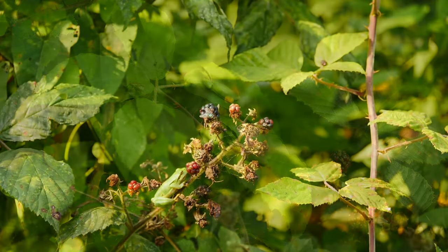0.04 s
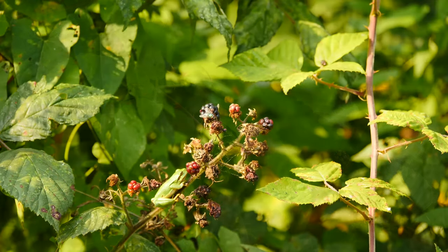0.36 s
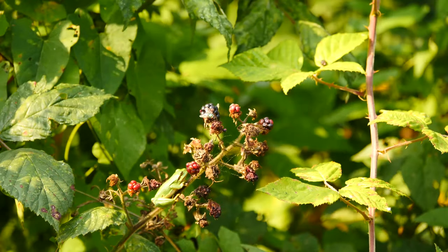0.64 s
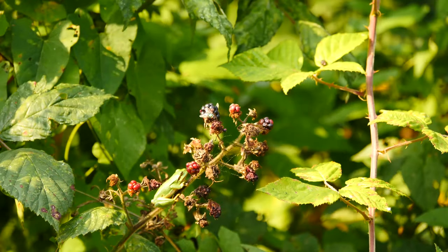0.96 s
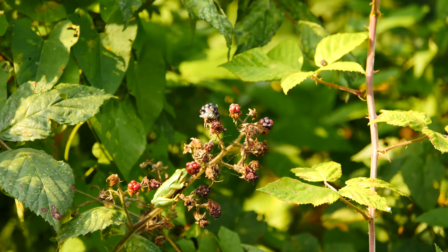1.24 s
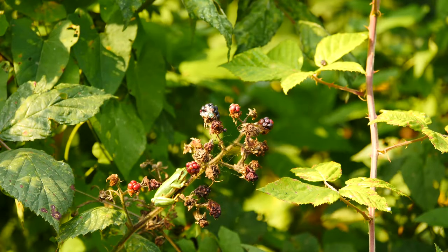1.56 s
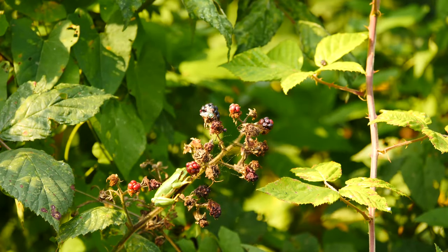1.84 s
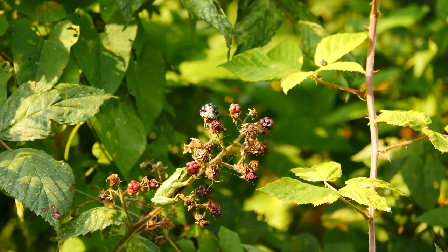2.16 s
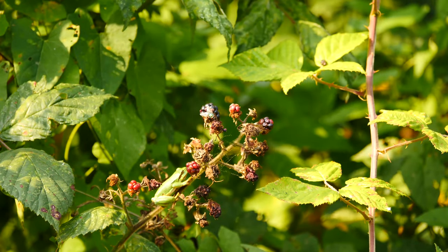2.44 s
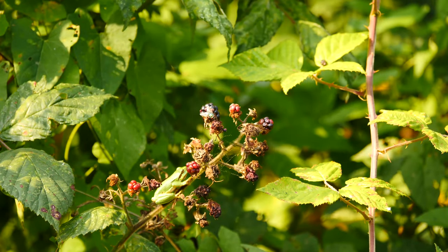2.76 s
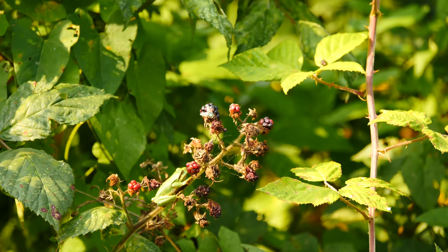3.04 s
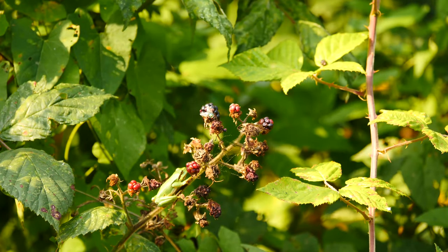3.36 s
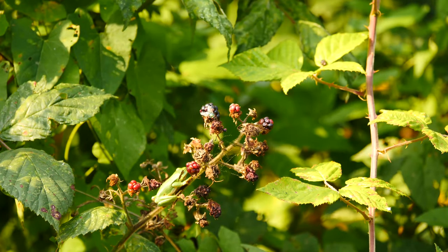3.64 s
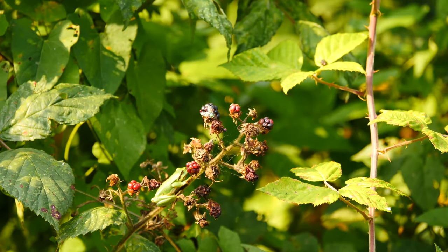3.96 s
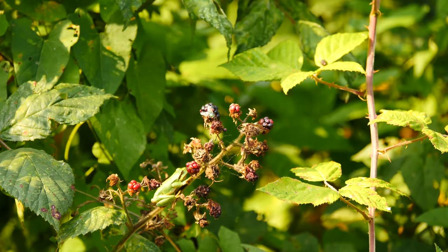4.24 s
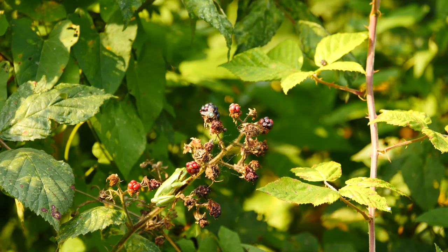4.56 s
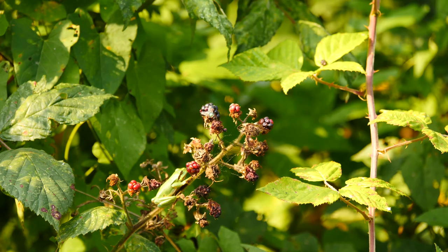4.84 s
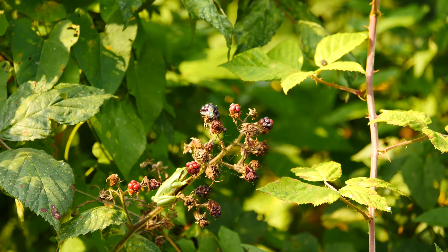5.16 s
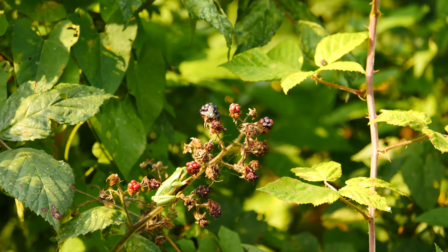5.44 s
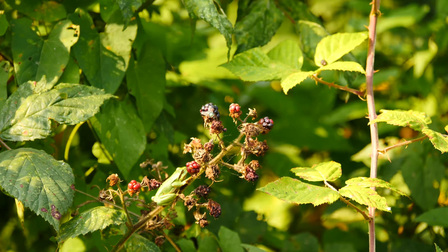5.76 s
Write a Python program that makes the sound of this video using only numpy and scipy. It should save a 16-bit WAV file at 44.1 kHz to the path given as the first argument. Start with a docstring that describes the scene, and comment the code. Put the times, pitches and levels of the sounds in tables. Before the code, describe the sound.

Several tree frogs croak in quick, overlapping rattles while a bush cricket trills close by, high and dry, over faint outdoor rumble.

```python
"""A bush cricket trills close by, high and dry, at a near-steady tempo with one short rest:
on each opening and closing stroke a scraper slips over a toothed file and rings the wing.
Several tree frogs croak in turn, each croak a quick rattle of pulses ringing in throat and vocal sac.
Behind them lie the thin hiss of far insects and a faint outdoor rumble."""
import sys
import numpy as np
from scipy import signal
from scipy.fft import rfft, irfft
from scipy.io import wavfile
from scipy.ndimage import uniform_filter1d, minimum_filter1d

SR = 44100
rng = np.random.default_rng(int(sys.argv[2]) if len(sys.argv) > 2 else 0)


def waveform_to_disk(signal):
    """Save audio, clipped to [-1, 1], as 16-bit WAV at the path in sys.argv[1]."""
    frames = np.transpose(np.atleast_2d(signal))
    scaled = np.clip(frames, -1, 1) * 32767
    samples = np.round(scaled).astype(np.int16)
    wavfile.write(sys.argv[1], SR, samples)


N = 255339


def gain_of(db):
    """Decibels to gain."""
    return 10 ** (np.asarray(db) / 20)


def unit_rms(x):
    """Normalises to rms 1."""
    return x / np.sqrt(np.mean(x ** 2) + 1e-20)


def curve_at(curve, hz):
    """Reads a curve on a log-frequency axis."""
    f, value = np.transpose(curve)
    return np.interp(np.log(hz + 1), np.log(f + 1), value)


def add(mix, start_s, sound):
    """Drops a sound into the mix, trimmed to fit."""
    at = round(start_s * SR)
    sound = sound[max(-at, 0):]
    part = mix[max(at, 0):][:len(sound)]
    part += sound[:len(part)]


def equalise(x, curve):
    """Applies an EQ curve."""
    return irfft(rfft(x) * gain_of(curve_at(curve, np.fft.rfftfreq(N, 1 / SR))), N)


def low_pass(x, hz):
    """Steep high cut."""
    return signal.fftconvolve(x, signal.firwin(511, hz, window=("kaiser", 9), fs=SR), "same")


def drift(rate_hz):
    """Random modulator of rms 1."""
    t = np.arange(N) / SR
    knots = np.arange(0, t[-1] + 1, 1 / rate_hz)
    return unit_rms(np.interp(t, knots, rng.standard_normal(4096)[:len(knots)]))


# tone of the rumble: (frequency [Hz], relative level [dB])
RUMBLE_EQ = [(20, 1), (60, -3.5), (130, 0), (300, -2), (700, -4), (1100, -1.5), (1700, -6), (2300, -1),
             (3200, -7.5), (3950, -9), (4250, -42), (6000, -62)]
# its stereo image: (frequency [Hz], left-right correlation [0-1])
RUMBLE_CORRELATION = [(25, 1), (70, 0.85), (160, 0.19), (400, 0.61), (800, 0.99), (1500, 1)]


def rumble(level_db=-49, waver_db=3.0):
    """A bed of low outdoor noise, widest in the upper bass."""
    mid, side = rng.standard_normal((2, N))
    correlation = np.clip(curve_at(RUMBLE_CORRELATION, np.fft.rfftfreq(N, 1 / SR)), -1, 1)
    mid = irfft(rfft(mid) * np.sqrt(1 + correlation), N)
    side = irfft(rfft(side) * np.sqrt(1 - correlation), N)
    bed = unit_rms(equalise(np.array([mid + side, mid - side]), RUMBLE_EQ))
    return gain_of(level_db + waver_db * drift(rate_hz=14)) * bed


# tone of the far insects: (frequency [Hz], relative level [dB])
INSECT_EQ = [(3000, -42), (5000, -33.5), (7000, -23), (8500, -7.5), (9600, 5.5), (10700, 0), (12000, -5),
             (14000, -16), (16000, -15)]


def far_insects(level_db=-36, waver_db=2.03, side_db=-14):
    """Many distant insects merge into a wavering hiss."""
    mid, side = (unit_rms(equalise(rng.standard_normal(N), INSECT_EQ)) for _ in range(2))
    hiss = mid + gain_of(side_db) * np.array([side, -side])
    return gain_of(level_db + waver_db * drift(rate_hz=39)) * hiss


def foliage(x, t60, predelay_s=0.0041):
    """Sparse reflections from leaves and ground, dying quickly."""
    t = np.arange(SR // 2) / SR
    taps = rng.standard_normal(len(t)) * (rng.random(len(t)) < .1)
    taps *= (t > predelay_s) * gain_of(-60 * t / t60)
    return signal.fftconvolve(x, taps / np.linalg.norm(taps))[:N]


# frog presets by name: (upper ring [Hz], lower ring [Hz], lower ring level [dB], pulse length [ms],
# crescendo [dB], slowing [share, negative speeds up], pitch climb over the croak [share])
FROG_VOICES = {"deep": (2210, 1062.5, -4.5, 5.5, 8, 0.21, 0.05),
               "high": (2606, 1264, -5.5, 3.5, 6.5, -0.16, 0.08),
               "middle": (2288.5, 1186, -7.5, 6, 4.5, -0.12, .03),
               "low": (2150, 1001.5, -12.5, 4.5, 5, 0.29, 0),
               "quick": (2325, 1115.5, -3.5, 4.5, 2, 0, 0.07),
               "sharp": (2290, 1065, -10.5, 4, 8, 0.14, .025), "far": (2654, 1244.5, 3.5, 4, 0.5, -0.03, 0)}


def croak(start_s, voice, count, rate_hz, db, droop=0.0366, scatter=0.01401, detune=0.00622,
          uneven_db=0.54, skew=0.23, lower_lag_s=0.00055, lower_stretch=1.15):
    """Pulses swell and lengthen; in each, two resonances sag in pitch as the pressure drops."""
    upper_hz, lower_hz, lower_db, length_ms, crescendo_db, slowing, climb = FROG_VOICES[voice]
    progress = np.linspace(0, 1, count)[:, None]
    chance = rng.standard_normal((12, 5))[:count, :, None]  # per pulse: level, two pitches, two phases
    tuning = 1 + detune * rng.standard_normal()
    pulse_s = (count - 1) / rate_hz * (progress + slowing * progress * (progress - 1))
    t = np.arange(-.012, pulse_s[-1, 0] + .02, 1 / SR) - pulse_s
    swell_db = crescendo_db * (count / 6.67) ** 1.7  # a longer croak starts more softly
    force = gain_of(db - swell_db * (progress / 0.69 - 1) ** 2 + uneven_db * chance[:, 0])
    half_s = length_ms / 1000 * (0.71 + 0.56 * progress) / 2

    def ring(hz, age, k):
        """One resonance, its attack quicker than its decay."""
        envelope = force * (1 + (age / (1 + skew * np.tanh(age))) ** 2 / 3) ** -3
        pitch = hz * (tuning + climb * (progress - .7) + scatter * chance[:, k] - droop * np.tanh(age))
        cycles = np.cumsum(pitch, 1) / SR + chance[:, k + 2]
        return envelope * np.sin(2 * np.pi * cycles), envelope

    upper, envelope = ring(upper_hz, t / half_s, 1)
    lower, _ = ring(lower_hz, (t - lower_lag_s) / (half_s * lower_stretch), 2)
    rattle = (upper + gain_of(lower_db) * lower).sum(0)
    return start_s + t[0, 0], rattle, envelope.sum(0)


def distant_croaks(level_db=-44, spread_db=2, calls=34):
    """Faint frogs further back call at random and fill the pauses."""
    mix = np.zeros(N)
    for k, (when, who, loud) in enumerate(rng.random((calls, 3))):
        voice = list(FROG_VOICES)[int(who * len(FROG_VOICES))]
        db = level_db + spread_db * (2 * loud - 1)
        start_s, rattle, _ = croak((k + when) / calls * N / SR, voice, count=7, rate_hz=92, db=db)
        add(mix, start_s, rattle)
    return mix


# cue list, one croak a row: (time [s], voice, pulses [count], pulse rate [Hz], relative level [dB])
CROAK_CUES = [(-.029, "high", 5, 78, -21), (-.015, "quick", 6, 115, -24), (.036, "low", 6, 122, -27),
              (.135, "far", 6, 81, -32.5), (.188, "low", 7, 106, -26), (.276, "high", 7, 92, -19.5),
              (.359, "low", 5, 99, -27), (.406, "deep", 6, 72.6, -20.5), (0.42, "quick", 7, 103, -29),
              (.473, "far", 5, 87, -35.5), (.498, "low", 7, 106, -29), (.585, "high", 6, 89, -20.5),
              (.618, "quick", 6, 118, -27.5), (.638, "low", 9, 115, -29), (.722, "deep", 4, 63, -21.5),
              (.772, "quick", 8, 98, -28), (0.79, "low", 7, 101, -27.5), (.884, "quick", 7, 110, -29.5),
              (.905, "high", 5, 88, -21), (.958, "deep", 7, 71.5, -22), (.974, "low", 7, 91, -31.5),
              (1.031, "quick", 5, 105, -28), (1.067, "middle", 7, 94, -24.5), (1.141, "low", 9, 100, -24),
              (1.214, "deep", 6, 72.4, -21), (1.217, "high", 5, 95, -20), (1.238, "quick", 5, 92, -40),
              (1.297, "low", 5, 99, -28), (1.343, "far", 6, 82, -33.5), (1.405, "low", 4, 97, -42),
              (1.453, "low", 7, 97, -26), (1.492, "deep", 4, 71, -21), (1.5, "high", 6, 80, -23.5),
              (1.511, "quick", 5, 84, -32), (1.612, "middle", 7, 72, -28), (1.712, "deep", 5, 73, -23.5),
              (1.738, "sharp", 5, 104, -29), (1.76, "high", 9, 85, -23), (1.864, "quick", 5, 94, -33),
              (1.908, "deep", 9, 72.6, -21.5), (1.961, "far", 7, 65, -37), (1.996, "quick", 7, 122, -29),
              (2.115, "high", 7, 89, -20.5), (2.182, "deep", 7, 78.5, -21.5), (2.208, "quick", 10, 97, -40),
              (2.216, "middle", 7, 82, -26), (2.277, "sharp", 10, 110, -25), (2.295, "far", 6, 76, -32),
              (2.34, "far", 5, 115, -37), (2.442, "high", 6, 94, -20.5), (2.452, "deep", 6, 72, -22),
              (2.575, "quick", 9, 104, -27.5), (2.633, "far", 6, 82, -35), (2.664, "deep", 7, 68, -21.5),
              (2.774, "sharp", 6, 110, -23), (2.776, "high", 6, 77, -22), (2.829, "quick", 7, 106, -28.5),
              (2.901, "deep", 9, 78.5, -22.5), (2.945, "sharp", 5, 120, -25.5),
              (2.955, "middle", 5, 68.6, -25), (3.073, "high", 8, 96, -24), (3.083, "quick", 8, 92, -28),
              (3.197, "deep", 7, 80, -23.5), (3.221, "middle", 8, 88, -25), (3.263, "quick", 8, 112, -28),
              (3.324, "quick", 8, 95, -29.5), (3.381, "high", 6, 83.6, -21.5),
              (3.429, "sharp", 7, 114, -24.5), (3.491, "far", 6, 93, -34), (3.508, "deep", 6, 67, -19.5),
              (3.54, "middle", 6, 60, -28), (3.594, "quick", 7, 124, -26.5), (3.674, "high", 9, 91, -21.5),
              (3.743, "sharp", 9, 104, -22), (3.795, "quick", 6, 90, -30.5), (3.833, "deep", 6, 69, -20),
              (3.888, "middle", 9, 83, -26.5), (3.931, "sharp", 5, 110, -26), (4.02, "far", 6, 103, -34.5),
              (4.046, "quick", 8, 114, -26.5), (4.112, "deep", 6, 69.5, -20), (4.17, "sharp", 6, 105, -23),
              (4.215, "middle", 6, 81, -26), (4.24, "high", 7, 84, -31.5), (4.243, "quick", 9, 98, -26.5),
              (4.322, "low", 6, 89, -27), (4.35, "sharp", 7, 100, -23.5), (4.4, "deep", 5, 69, -19),
              (4.483, "quick", 9, 105, -24), (4.507, "high", 6, 70, -26), (4.571, "sharp", 8, 113, -24.5),
              (4.636, "deep", 8, 82, -20), (4.711, "low", 5, 88, -26.5), (4.766, "middle", 8, 83, -28),
              (4.77, "far", 6, 84, -34), (4.85, "quick", 7, 94, -27), (4.855, "far", 5, 85, -34.5),
              (4.895, "deep", 6, 72.6, -21), (4.912, "sharp", 7, 107, -28.5), (4.978, "far", 6, 93, -35),
              (5.043, "deep", 8, 74, -23.5), (5.061, "far", 7, 75, -36), (5.16, "far", 9, 89, -33.5),
              (5.176, "low", 5, 109, -28.5), (5.216, "quick", 9, 107, -30), (5.326, "low", 6, 94, -28.5),
              (5.394, "middle", 6, 81, -25.5), (5.405, "quick", 8, 119, -28), (5.413, "far", 6, 81, -32.5),
              (5.486, "low", 6, 91, -29), (5.596, "quick", 8, 140, -29.5), (5.6, "far", 6, 84, -34),
              (5.655, "low", 4, 95, -24), (5.679, "middle", 9, 97, -24.5)]


def frogs(gain_db=2.5, rasp_db=-13, echo_db=-16, cutoff_hz=4080):
    """The chorus: ringing pulses, their rasp of air, and a short echo from the bushes."""
    chorus, airflow = distant_croaks(), np.zeros(N)
    for cue in CROAK_CUES:
        start_s, rattle, envelope = croak(*cue)
        add(chorus, start_s, rattle)
        add(airflow, start_s, envelope)
    chorus += gain_of(rasp_db) * rasp(airflow)
    chorus += gain_of(echo_db) * foliage(chorus, t60=0.16)
    return gain_of(gain_db) * low_pass(chorus, cutoff_hz)


# tone of the air in a frog's pulse: (frequency [Hz], gain [dB])
RASP_EQ = [(40, 1), (150, -0.5), (400, 0.5), (800, 1), (1250, 15.5), (1700, 5), (2500, 15), (3100, 3),
           (3950, 1), (4200, -41), (6000, -70)]


def rasp(airflow):
    """Breath noise that rides the envelope of the pulses."""
    return equalise(airflow * rng.standard_normal(N), RASP_EQ)


# resonance of the cricket's wing: (frequency [Hz], relative level [dB])
WING_RESONANCE = [(3000, -78), (5000, -53), (6500, -44), (8000, -31), (9300, -17), (10000, -14),
                  (10400, 1.5), (10900, 3), (11500, -8), (12200, -6), (13400, -17), (14500, -34),
                  (15600, -24.5), (17000, -46)]


def wing_ring(sharpness=0.41, size=2048):
    """The wing's centred ring after one snap; sharpness 0 is a round burst, 1 a hard attack and tail."""
    log_gain = np.log(gain_of(curve_at(WING_RESONANCE, abs(np.fft.fftfreq(size, 1 / SR)))))
    phase = -sharpness * signal.hilbert(log_gain).imag
    ring = np.fft.ifft(np.exp(log_gain + 1j * phase)).real
    return np.fft.fftshift(ring) / np.linalg.norm(ring)


# the cricket's phrases: (start [s], wing cycles [count])
PHRASES = [(.021, 3), (.633, 60)]
# its tempo, quickest just after the rest: (time [s], wing cycle rate [Hz])
WING_TEMPO = [(.2, 11.47), (.7, 12.08), (1.3, 11.638), (1.9, 11.669), (2.5, 11.484), (3.1, 11.758),
              (3.7, 11.497), (3.9, 11.59), (4.9, 11.613), (5.1, 11.299), (5.7, 11.476)]


def wing_cycles(close_share=0.33):
    """Opening and closing times in seconds; the wings close part-way through each cycle."""
    t = np.arange(N) / SR
    cycles = np.cumsum(np.interp(t, *np.transpose(WING_TEMPO))) / SR
    openings = np.concatenate([np.interp(s, t, cycles) + np.arange(count) for s, count in PHRASES])
    return np.interp(openings[:, None] + [0, close_share], cycles, t)


def stroke(force, gap_ms=2.1, slowing_ms=16, rebound_ms=0.6465, rebound=0.77,
           jitter_ms=0.065, rebound_jitter_ms=0.024, uneven_db=0.5, size=2048):
    """The scraper slips ever more slowly over the file; each tooth snaps twice. Centred in its frame."""
    tooth = np.arange(-20, 7) + rng.random()
    late, loud, rebound_late = rng.standard_normal((3, len(tooth)))
    snap_ms = -slowing_ms * np.log(np.maximum(1 - tooth * gap_ms / slowing_ms, 1e-3)) + jitter_ms * late
    hit = (snap_ms > force[0][0]) & (snap_ms < force[-1][0])
    push = gain_of(np.interp(snap_ms, *np.transpose(force)) + uneven_db * loud)[hit]
    phase_per_ms = -2j * np.pi * np.fft.rfftfreq(size, 1000 / SR)[:, None]
    lag_ms = rebound_ms + rebound_jitter_ms * rebound_late[hit]
    snaps = np.exp(phase_per_ms * snap_ms[hit]) * (1 + rebound * np.exp(phase_per_ms * lag_ms))
    return np.fft.fftshift(irfft((snaps * push).sum(1))) / np.linalg.norm(push)


# scraper force envelopes of the two strokes: (time from mid-stroke [ms], relative level [dB])
OPENING_FORCE = [(-6.5, -10), (-4.5, -5), (-3.5, 0.5), (3, 4), (4, 3.5), (5, -3), (5.5, -26), (13, -31)]
CLOSING_FORCE = [(-12, -20), (-10, -17), (-7, -9.5), (0.5, 0), (4.5, -3), (9, -4), (9, -25), (11, -38)]


def cricket(gain_db=23.5, open_db=-12, close_db=-11, spread_db=0.2,
            tick_db=-31, tick_spread_db=3, tick_chance=.72, tick_lead_s=0.0105, early_s=.0004):
    """Opening and closing strokes ring the wing; in most cycles the wings tick as they touch first."""
    snaps = np.zeros(N)
    for open_s, close_s in wing_cycles():
        tick_accent, open_dip, close_dip = rng.standard_normal(3)
        tick = stroke([(-1.5, 0), (2.2, 2)], gap_ms=0.91) * (rng.random() < tick_chance)
        hits = [(open_s - tick_lead_s, tick_db + tick_spread_db * tick_accent, tick),
                (open_s, open_db - spread_db * open_dip, stroke(OPENING_FORCE)),
                (close_s, close_db - spread_db * close_dip, stroke(CLOSING_FORCE))]
        for centre_s, db, teeth in hits:
            add(snaps, centre_s - len(teeth) / 2 / SR - early_s, gain_of(db) * teeth)
    return gain_of(gain_db) * signal.fftconvolve(snaps, wing_ring(), "same")


def scene(left_db=0.7, right_db=1.5, leaves_db=-24.5):
    """The cricket a touch to the right among leaves, the frogs dead centre, hiss and rumble behind."""
    trill = cricket()
    panned = trill * gain_of([[left_db], [right_db]])
    leaves = gain_of(leaves_db) * np.array([foliage(trill, t60=0.13) for _ in range(2)])
    return frogs() + panned + leaves + far_insects() + rumble()


def record(dry, ceiling=.92, window=129, cutoff_hz=15900):
    """A fast limiter eases peaks near full scale, followed by a high cut."""
    needed_gain = np.minimum(1, ceiling / (abs(dry).max(0) + 1e-9))
    smooth_gain = uniform_filter1d(minimum_filter1d(needed_gain, window), window)
    return np.array([low_pass(channel, cutoff_hz) for channel in dry * smooth_gain])


dry = scene()
out = record(dry)
waveform_to_disk(out)
```